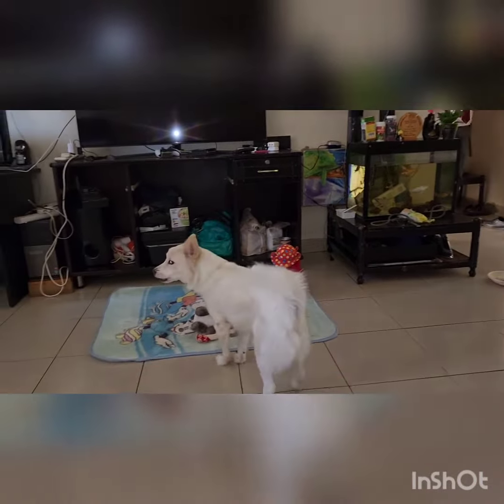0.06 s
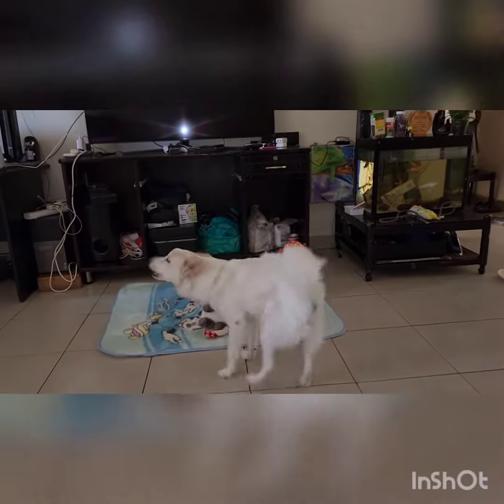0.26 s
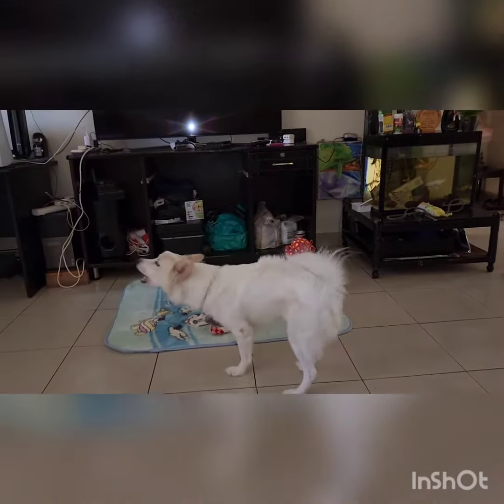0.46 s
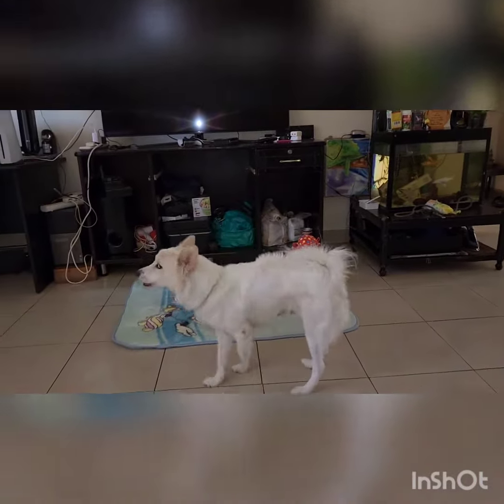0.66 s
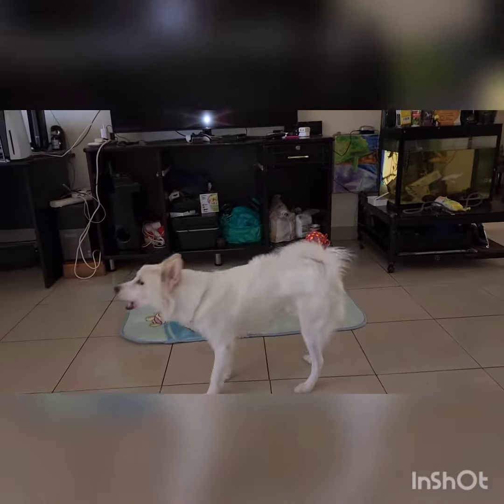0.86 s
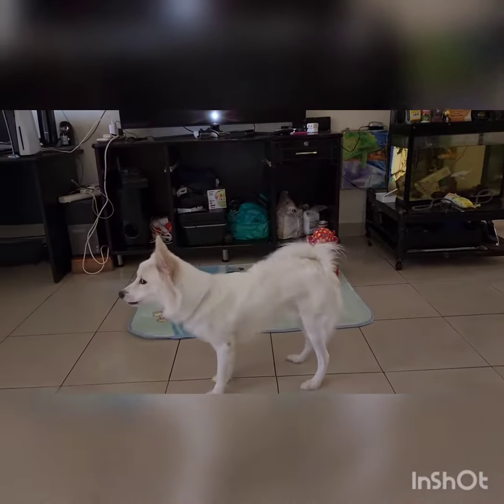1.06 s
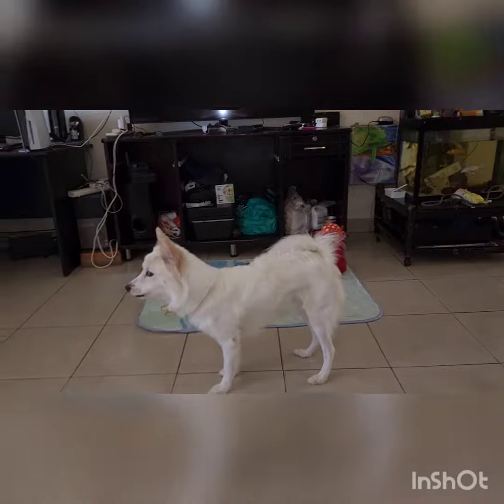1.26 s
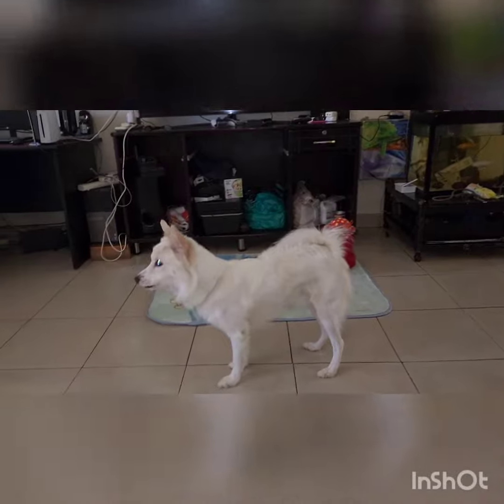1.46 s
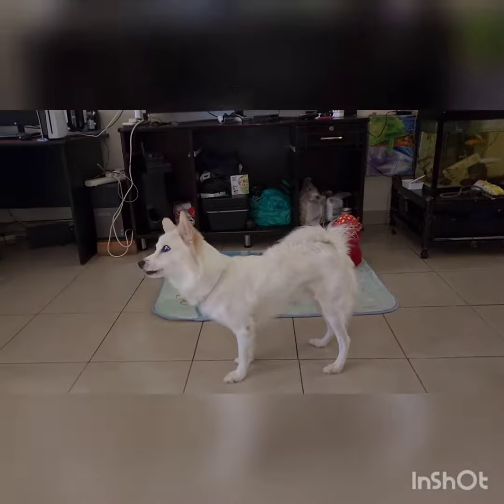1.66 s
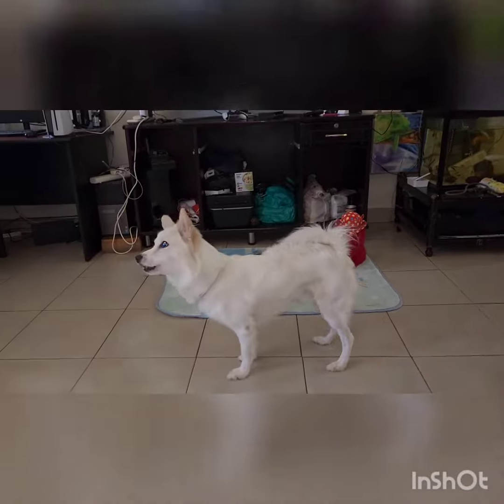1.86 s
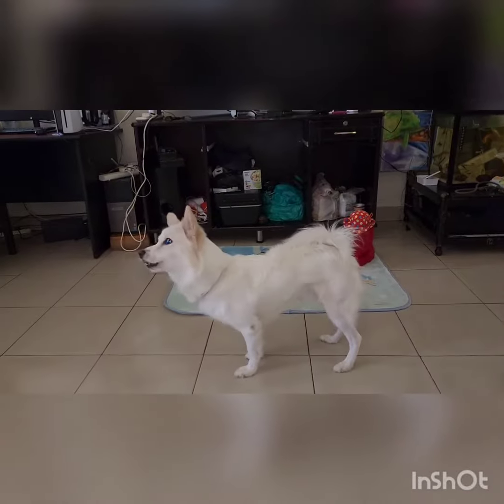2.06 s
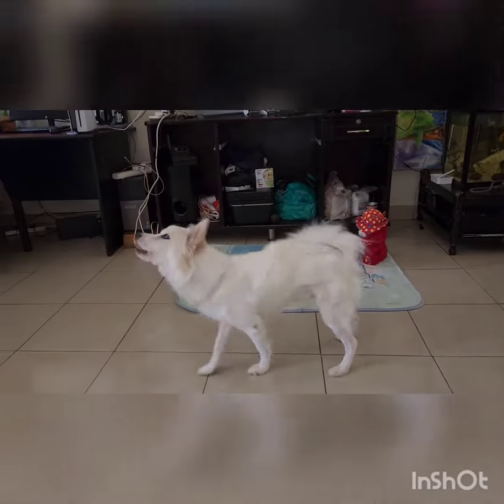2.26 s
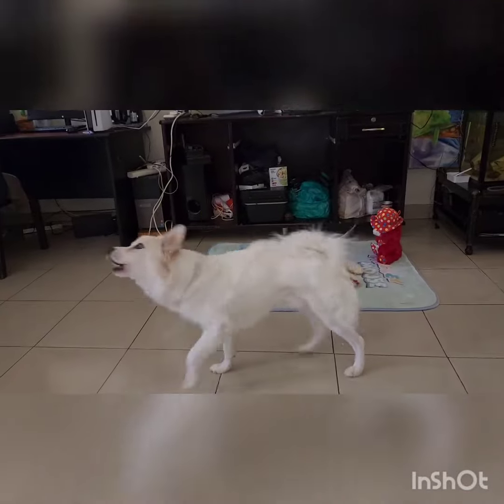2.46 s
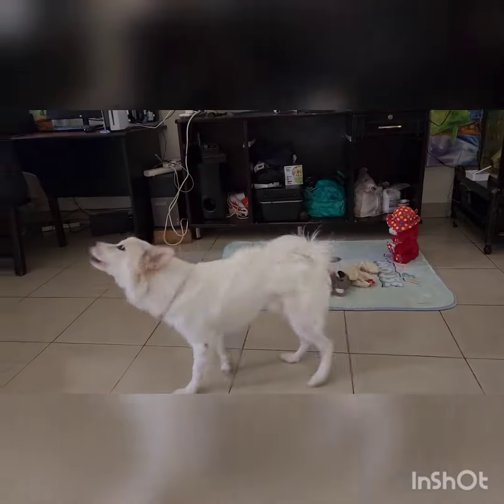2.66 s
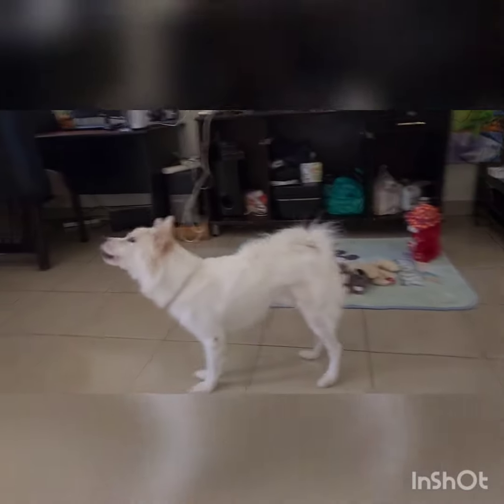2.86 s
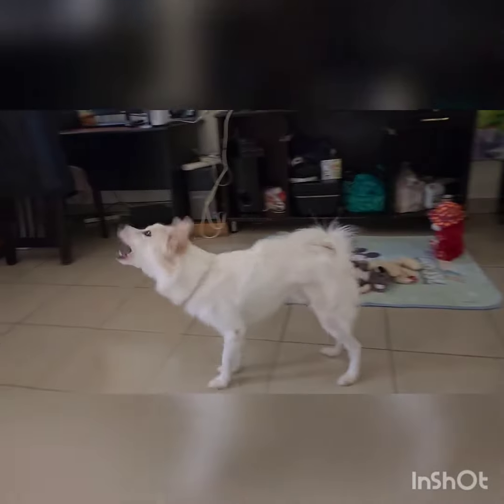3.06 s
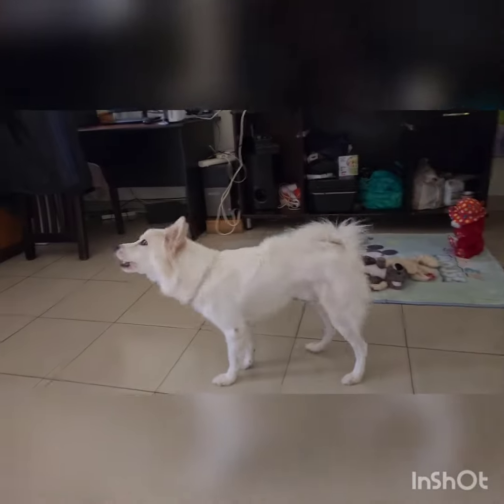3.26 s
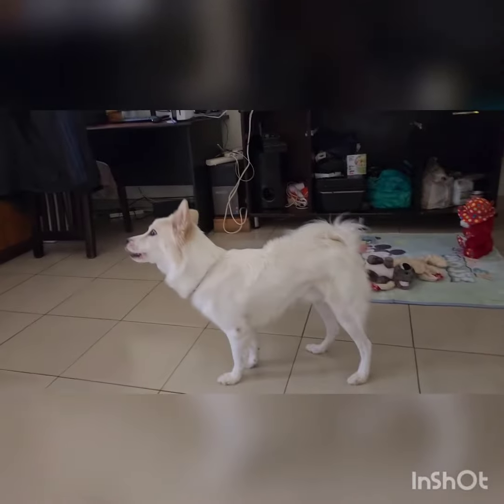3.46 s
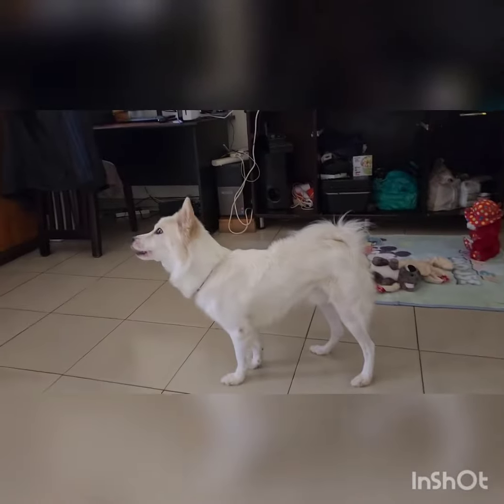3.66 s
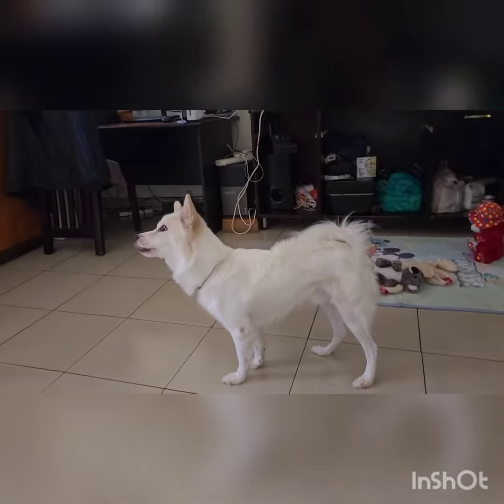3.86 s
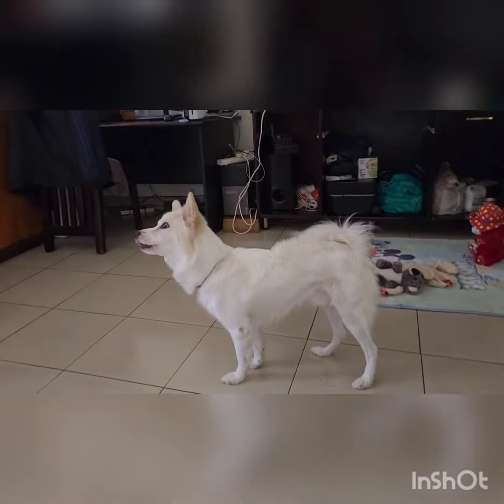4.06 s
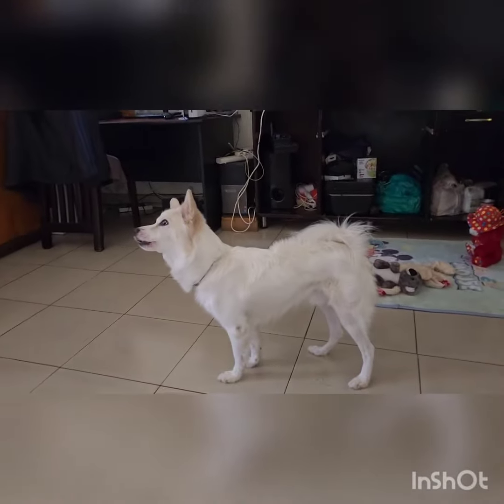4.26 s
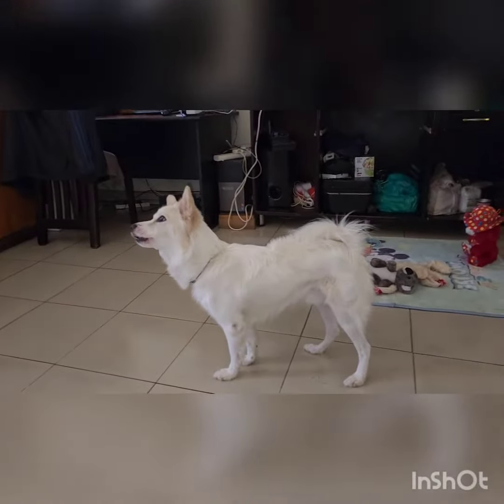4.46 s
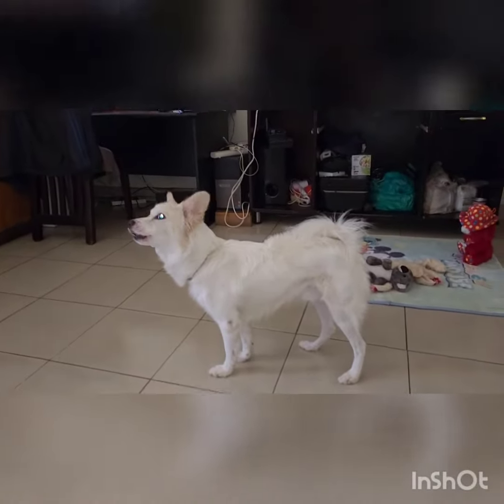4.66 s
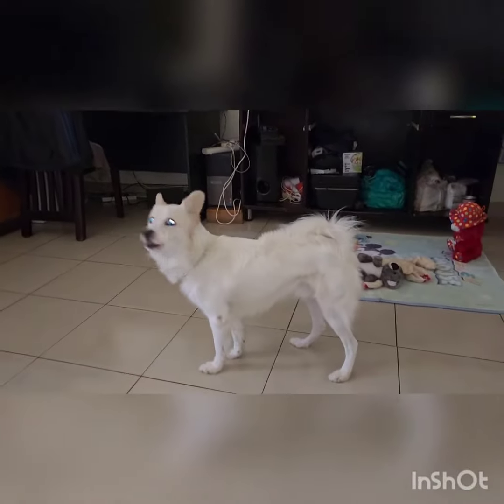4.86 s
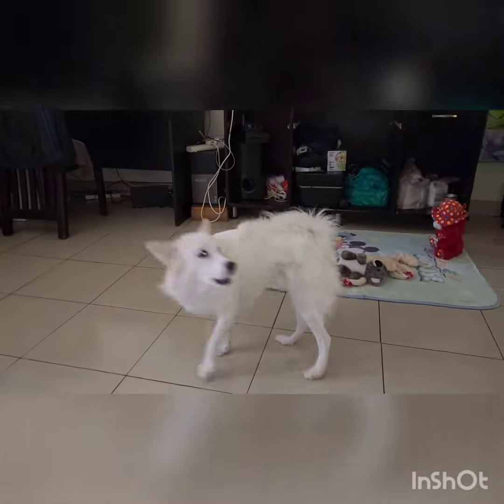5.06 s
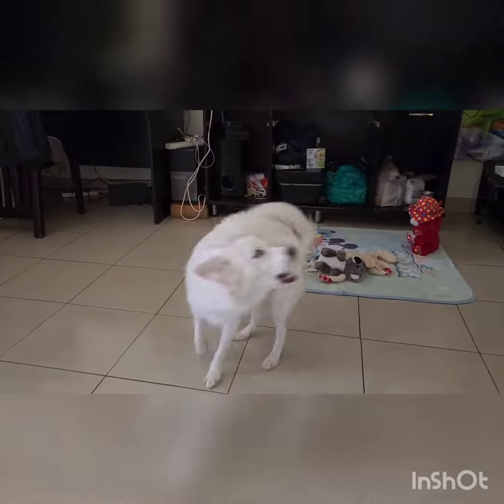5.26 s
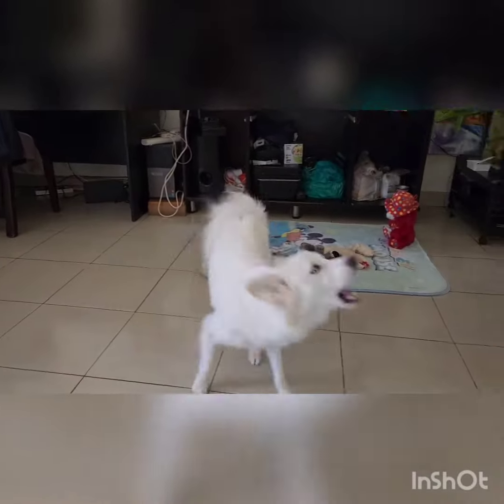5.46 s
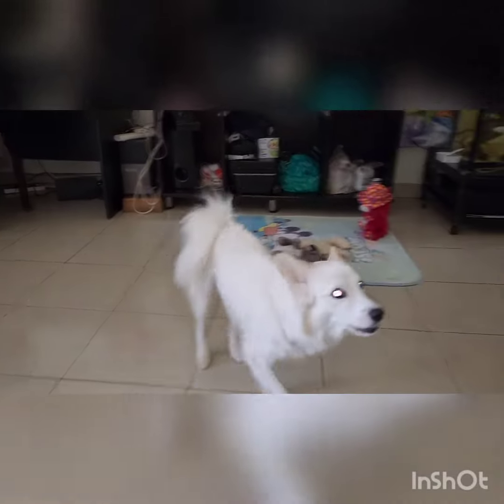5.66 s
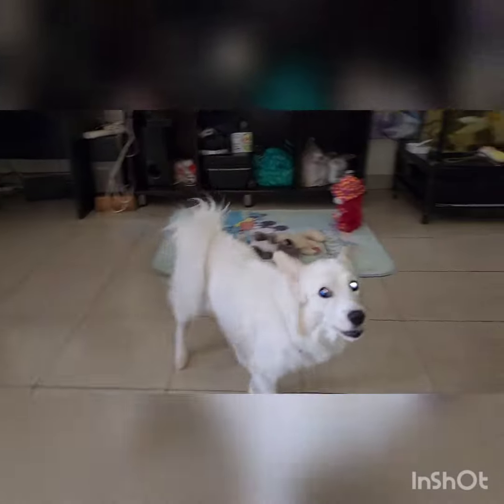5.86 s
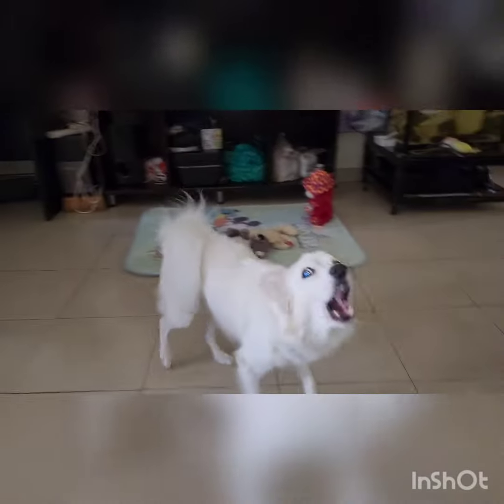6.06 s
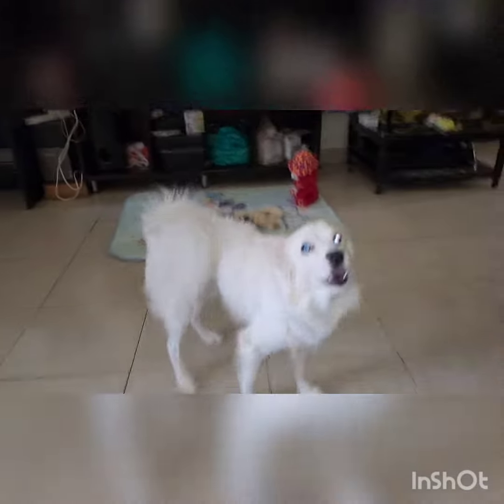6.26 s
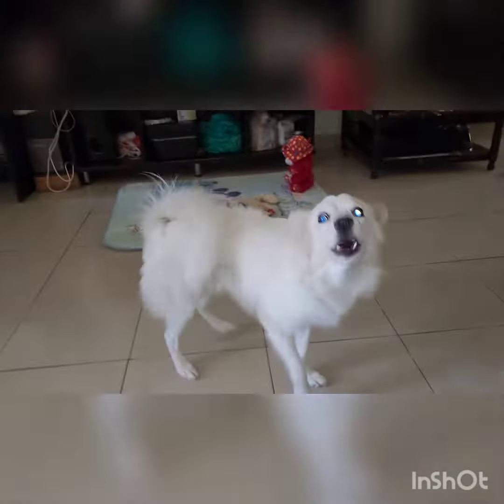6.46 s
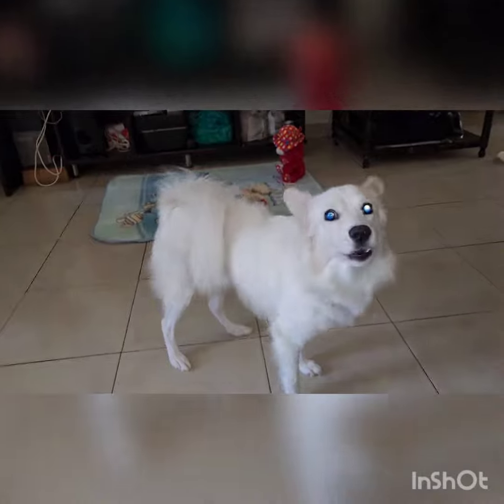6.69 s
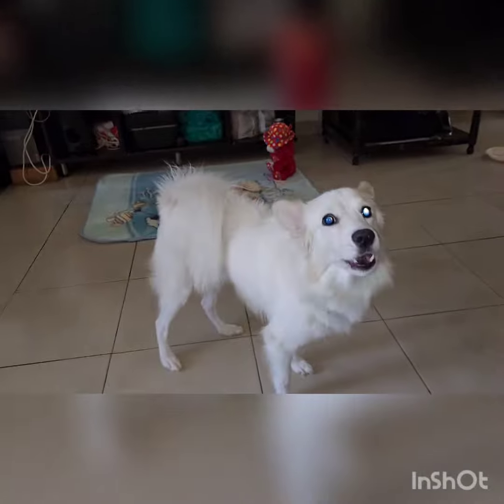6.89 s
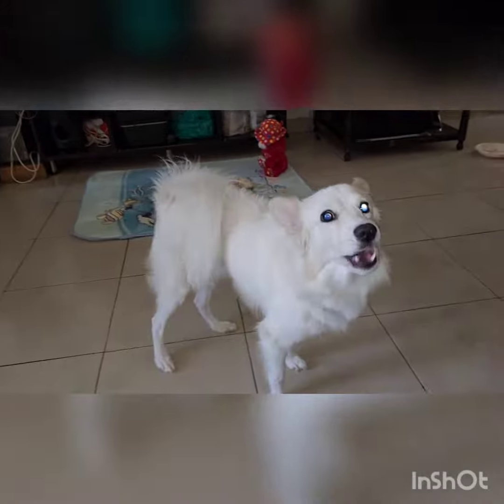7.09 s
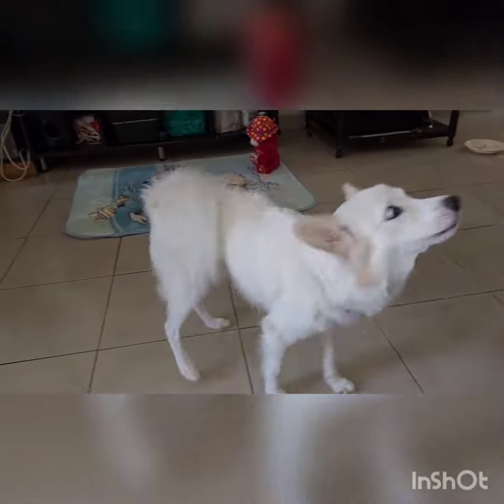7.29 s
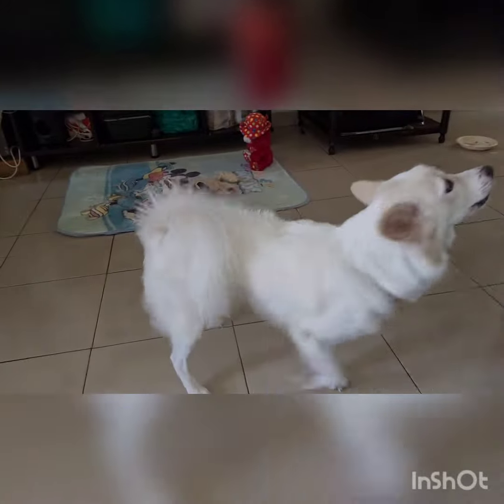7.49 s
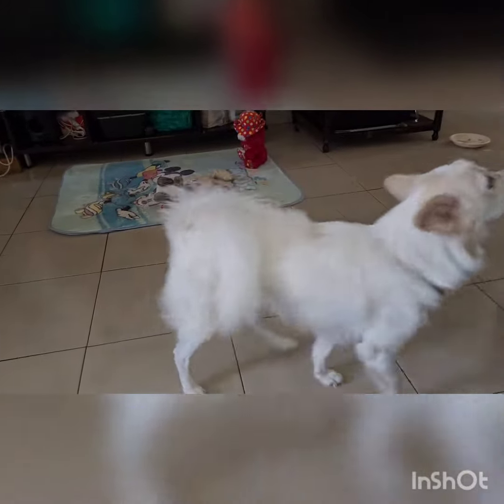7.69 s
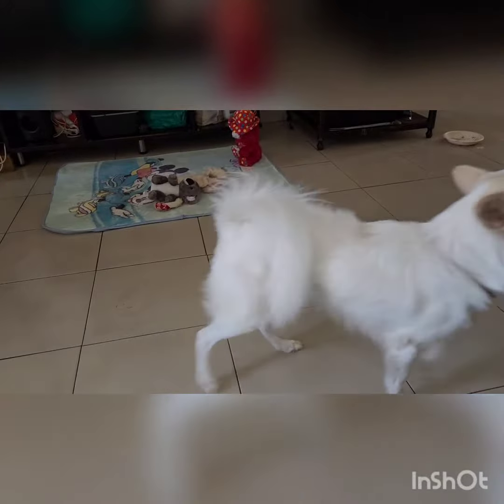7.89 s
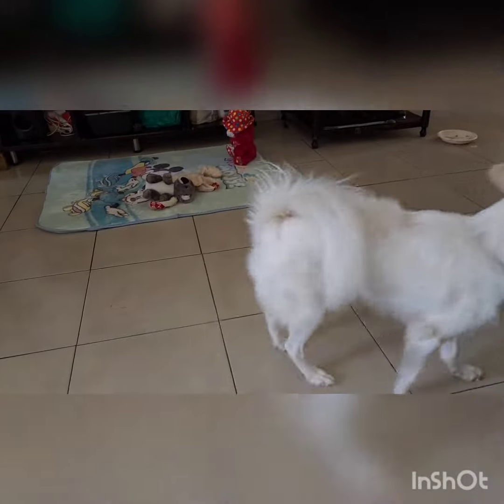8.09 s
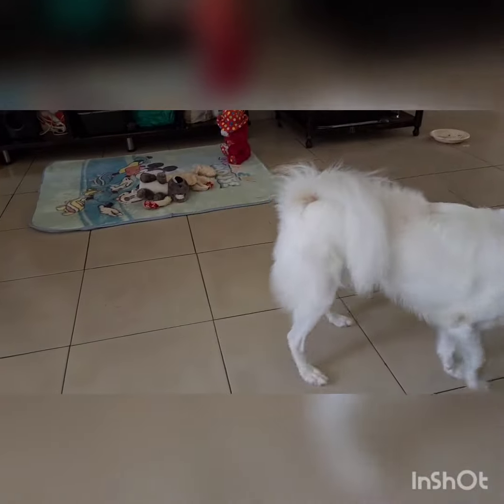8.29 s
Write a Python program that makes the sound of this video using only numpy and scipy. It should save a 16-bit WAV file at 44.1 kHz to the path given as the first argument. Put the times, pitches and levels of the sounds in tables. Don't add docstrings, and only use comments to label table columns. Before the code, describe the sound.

Indoors on hard tile, a phone microphone hears a small dog's high, raspy barks with bright echoes. Grumbling leads into the first bout; a muffled door slam precedes a second. A pause holds only hum, soft breath and faint ticks. A sharp wooden knock bounces, then come nearer, higher barks spaced apart with short growls, drifting right, and finally a soft pant and faint bumps.

```python
import sys
import numpy as np
from scipy import signal
from scipy.fft import rfft, irfft, next_fast_len
from scipy.io import wavfile
from scipy.ndimage import uniform_filter1d, map_coordinates

SR = 44100
rng = np.random.default_rng(int(sys.argv[2]) if len(sys.argv) > 2 else 0)


def boost_factor(decibels):
    exponent = np.asarray(decibels, float) / 20
    return 10 ** exponent


def unload_audio(sound):
    columns = np.transpose(np.atleast_2d(sound))
    steps = np.round(np.clip(columns, -1, 1) * 32767)
    wavfile.write(sys.argv[1], SR, steps.astype(np.int16))


N = 367353

TURN_S = 5.9

# f/Hz, t60/s
ROOM_T60 = [(150, 0.81), (600, 0.76), (1200, 0.79), (2500, 0.58), (6000, 0.49), (9000, 0.4), (14000, 0.57)]
# f/Hz, likeness/1
COHERENCE = [(60, 0.95), (200, 1), (500, 0.2), (1000, 0.045), (2000, 0.088), (5000, 0.057)]
# f/Hz, level/dB
ECHO_AWAY = [(120, 6), (250, -3), (700, 3.5), (2000, 4.5), (5000, 12), (14000, 14)]
# f/Hz, level/dB
ECHO_FACING = [(150, 6.5), (700, 6.5), (2000, 2), (5000, 4.5), (14000, 7)]
# f/Hz, level/dB
ECHO_FLOOR = [(120, -4), (300, 9.5), (1000, 2.5), (3000, 1.5), (8000, 10)]
# t/s, left lag/samples, left minus right treble/dB
PLACE = [(0, -3.5, 2), (3.3, -7.5, 4.5), (5.103, -3.5, -4.5), (5.552, 6, -10), (8.33, 9, -11.5)]
# f/Hz, left minus right level/dB
PORTS = [(60, 1.3), (110, -2.5), (200, 0.5), (380, -2.5), (700, 0.5), (1290, -3.5), (2380, -3.5),
         (4400, -0.5), (8120, -4.5), (15000, 1)]

# t/s, level/dB
HUM_LEVEL = [(0.0, -43), (0.44, -54.5), (1.79, -60), (1.88, -36.5), (2.04, -36.5), (2.2, -45.5),
             (2.71, -55.5), (2.95, -50), (3.29, -57.5), (4.781, -52), (5.08, -39.5), (5.29, -62),
             (6.4, -58.5), (7.05, -58), (7.26, -62), (8.19, -62), (8.33, -58)]
# f/Hz, level/(dB per Hz)
HUM_SPECTRUM = [(12, -51), (20, -19.5), (65, -10), (182, -12), (270, -17.5), (293, -18.5), (499, -31.5),
                (542, -29.5), (759, -29.5), (825, -34), (1060, -36), (1290, -33), (4000, -46.5),
                (8500, -49), (9500, -68), (16000, -87)]
# t/s, level/dB
HISS_LEVEL = [(0, -74), (3.8, -75.5), (5.2, -73), (8.33, -79)]
# f/Hz, level/(dB per Hz)
HISS_SPECTRUM = [(200, -32.5), (400, 7.5), (1000, -7), (3000, -18), (8000, -15.5), (9000, -22),
                 (10000, -42), (15500, -55.5), (16500, -66)]
# t/s, level/dB
DRONE_LEVEL = [(0, -68), (.9, -54), (1.1, -51), (1.8, -56.5), (2.25, -41), (2.6, -43), (2.898, -57),
               (4.3, -51.5), (4.5, -54.5), (4.701, -51), (5.2, -67), (8.33, -70)]
# f/Hz, level/(dB per Hz)
DRONE_SPECTRUM = [(30, -37.5), (42, -11.5), (57, 13.5), (72, -5.5), (95, -48.5)]

# t/s, length/s, throat level/dB, first f/Hz, last f/Hz
GRUMBLES = [(0.023, 0.1, -23.5, 218.5, 244), (0.081, 0.17, -11.5, 228.7, 230.3),
            (0.447, 0.13, -28.5, 222.3, 232.3), (0.665, 0.12, -30, 245.3, 239),
            (0.975, 0.099, -37, 255, 224), (4.302, 0.11, -63.5, 181, 248), (5.061, 0.21, -18.5, 214, 263.1),
            (5.992, 0.1, -39, 198.4, 212.7), (6.917, .19, -21, 260, 256.5), (6.986, 0.17, -25, 294.6, 303),
            (7.1, 0.125, -25.5, 264.5, 197.6), (7.686, 0.098, -35, 246, 322.7),
            (7.755, 0.14, -34, 297.7, 324)]
GRUMBLE_GRIT = [(.4, .2, .2, .4), (.28, 0, .05, .4), (.5, 0, .2, .4), (.5, 0, .2, .4), (.35, 0, .2, .4),
                (.25, 0, .2, .4), (.5, .5, .2, 1), (.6, 0, .2, 1.5), (.1, .1, .25, 1.8), (.2, .2, 0, 1.8),
                (.35, .3, 0, 2), (.15, .1, .1, .5), (.2, .9, 0, .3)]
# throat f/Hz, swell/dB, relative fundamental/dB, relative rasp/dB, rasp band scale/1
GRUMBLE_THROAT = [(600, 10.5, -12.5, -26, 0.87), (590, 2, -13, -34.5, .97), (620, 3.5, -8.5, -20.5, 0.93),
                  (610, 6.5, -10.5, -31, 1.9), (590, 8.5, 2.5, -45, 0.83), (600, 5, 25.5, -14.5, .5),
                  (620, -2.5, -13.5, -27.5, 0.82), (551, 2, -5.5, -22, 2), (758, -4, -16.5, -27, 1.01),
                  (590, 4.5, -22, -29.5, 1.2), (560, 1.5, -12, -22.5, 1.01), (600, 0, -10, -33, 0.71),
                  (457, -10, -24, -38, .75)]
# f/Hz, width/Hz, level/dB
SHUT_FAR = [(316, 110, -9.5), (770, 440, -7.5), (1360, 860, -12.5), (2000, 160, -13.5)]
# f/Hz, width/Hz, level/dB
SHUT_NEAR = [(338, 156, -6), (770, 466, -7), (1600, 380, -9.5), (2223, 290, -9.5)]
# f/Hz, level/(dB per Hz)
SHUT_RASP_FAR = [(1590, -53), (2700, -16.5), (3480, -16), (3770, -5), (4220, -4.5), (5360, -10.5),
                 (6120, -19), (6650, -14.5), (8620, -21), (16000, -29.5)]
# f/Hz, level/(dB per Hz)
SHUT_RASP_NEAR = [(3230, -17), (3800, -5), (4130, -2.5), (4700, -15), (5460, -34.5), (6090, -12),
                  (6700, -33), (7310, -15.5), (8410, -20), (9400, -27.5), (16000, -49)]

# t/s, pitch f/Hz, first partial level/dB
EFFORT_FAR = [
    [(.216, 560, -25), (.232, 571.4, -14.5), (.256, 572.5, -6), (.272, 638.5, -8.5), (.29, 725.5, -9.5),
     (.312, 700, -17.5), (.33, 672, -12.5), (.356, 630, -19.5)],
    [(.503, 656.6, -25), (.525, 694.6, -18.5), (.543, 731, -19), (.556, 649.7, -15), (.57, 613, -18.5),
     (.6, 626, -18), (.623, 620, -18.5)],
    [(.842, 643.4, -28.5), (.862, 674, -24), (.874, 703.2, -22.5), (.889, 656.3, -19), (.92, 648, -18.5),
     (.942, 626.3, -20.5)],
    [(2.16, 590, -23.5), (2.178, 636, -11.5), (2.202, 689.5, -7.5), (2.222, 720.7, -13),
     (2.243, 675.6, -10), (2.262, 634, -13), (2.28, 590, -20.5)],
    [(2.374, 560, -35), (2.396, 663.5, -24), (2.428, 713, -15), (2.46, 740.3, -22.5), (2.485, 637.5, -24),
     (2.524, 549, -26)],
    [(2.637, 590, -16), (2.654, 667, -13), (2.675, 686, -15), (2.693, 673, -19.5), (2.725, 686, -18.5),
     (2.747, 549, -23)],
    [(3.12, 560, -18), (3.138, 668.5, -21), (3.153, 695.5, -14.5), (3.172, 708.4, -14.5), (3.186, 625, -24),
     (3.2, 600, -19), (3.23, 544.6, -22.5)],
]
# t/s, pitch f/Hz, first partial level/dB
EFFORT_LATE = [
    [(5.218, 610, -20.5), (5.235, 633.7, -14.5), (5.255, 670, -8), (5.272, 705.3, -9.5), (5.29, 761, -14.5),
     (5.306, 718, -8), (5.328, 717.5, -15)],
    [(5.512, 642.4, -32.5), (5.538, 721, -15.5), (5.554, 711.4, -15.5), (5.575, 713.3, -14),
     (5.6, 677.6, -15), (5.622, 695, -13.5)],
    [(6.038, 600, -20.5), (6.059, 647, -27.5), (6.077, 784, -15), (6.1, 737, -16.5), (6.125, 714.8, -8.5),
     (6.168, 709.3, -13), (6.18, 674, -21.5), (6.2, 540, -32.5)],
    [(6.422, 560, -24), (6.436, 704, -23.5), (6.442, 800, -17.5), (6.457, 817.7, -11.5), (6.484, 770, -18),
     (6.51, 725, -18.5), (6.528, 740.4, -16), (6.552, 678.4, -26)],
    [(7.202, 620, -25), (7.219, 749.4, -11), (7.238, 778.6, -12), (7.255, 797.8, -11), (7.272, 719.5, -14),
     (7.288, 665, -19.5), (7.31, 643.7, -17.5), (7.345, 590, -29.5)],
]
BARK_MANNER = [(.3, .45, .15), (.45, .2, .1), (.45, .35, .15), (.3, .45, .3), (.55, .55, .3),
               (.32, .55, .3), (.2, .55, .3), (.3, .3, .2), (.55, .04, .05), (.6, .04, .25), (.25, .5, .4),
               (.5, .22, .25)]
# relative overtones/dB, relative rasp/dB, second resonance f/Hz, third resonance f/Hz
BARK_MOUTHS = [(3.5, -19, 1160, 1900), (3.3, -22.5, 1142, 1670), (3.7, -19, 1225, 1754),
               (0.48, -24, 1258, 1733), (3.1, -21, 1110, 1680), (2.15, -21.5, 1130, 1660),
               (3.8, -22.5, 1152, 1670), (3.4, -22.5, 1342, 1950), (0.5, -23, 1200, 1706),
               (1.7, -16.5, 1320, 2050), (4.9, -12, 1292, 1944), (1.5, -17, 1270, 1920)]
# resonance sink/1, rasp twang/dB, twang f/Hz, twang width/Hz, clear upper partials/dB
BARK_JAWS = [(0.0734, 2, 4150, 800, -1), (0, -2, 2000, 800, 0.5), (.1, -5.5, 4150, 380, 1),
             (0.2, 1.5, 1800, 800, 4.5), (.1, -4, 3400, 660, 0), (0.066, -2.5, 3700, 530, 1.5),
             (.2, -4.5, 4200, 380, 5), (.12, 8, 4700, 1200, -6), (0.17, 3.5, 5400, 1000, -4),
             (0.02, 4, 4150, 520, 5.5), (0.015, 10, 4140, 700, 1.5), (0.21, 5, 4150, 950, 9)]
# widest jaw at share/1, hardest air rush at share/1, relative third resonance/dB
BARK_TIMING = [(0.89, 1, 0.5), (0.48, 0.347, 0.7), (0.64, 0.19, 2.15), (0.13, 0.51, 0.7), (0.99, .45, -1.1),
               (0.8, 0.39, -0.8), (0.57, 0.64, 0), (0.71, 0.73, 0), (.4, 0.75, 1.5), (0.34, 0.37, 0.1),
               (0.56, 0.95, 1.6), (0.34, 0.51, 1.5)]
# f/Hz, level/(dB per Hz)
RASP_AWAY = [(1530, -29.5), (2300, -24.5), (2700, -13.5), (3080, -6), (3480, -19.5), (3900, -10),
             (4430, -12.5), (4960, -17.5), (6520, -10), (8070, -12.5), (9400, -22), (12000, -23.5),
             (14600, -27), (16000, -32)]
# f/Hz, level/(dB per Hz)
RASP_FACING = [(1530, -30), (2500, -16.5), (3000, -6), (4200, -18), (4920, -17), (6430, -9), (7200, -10.5),
               (8070, -7.5), (9820, -21.5), (11500, -21), (13500, -27.5), (16000, -30)]

# t/s, peak level/dB
CLAWS = [(1.299, -54.5), (1.3729, -43.5), (1.381, -45), (1.39, -49), (1.4712, -61), (1.7899, -53),
         (3.8849, -54), (4.4494, -58), (8.0371, -63), (8.073, -46)]

# latch level/dB, slam level/dB, fall/(dB per s)
DOOR_PARTS = [(-30.5, -15, 21), (-62, -26.5, 18), (-45, -21, 67), (-34.5, -32, 58.5)]
# f/Hz, level/dB
BOOM = [(36, -7), (59, -2.5)]
# f/Hz, level/dB
PANEL = [(121, 8), (168, -29), (284, 5)]
# f/Hz, level/(dB per Hz)
RATTLE = [(190, -29.5), (330, -7), (731, -11.5), (833, -4), (1310, -11.5), (2100, -12), (2510, -20.5),
          (3600, -23.5), (6000, -28.5), (7460, -23.5), (9000, -31.5), (10600, -31), (14500, -38.5),
          (16000, -51)]

# t/s, length/s, level/dB
CHEST = [
    (2.516, 0.2, -43),
    (3.121, 0.086, -40.5),
    (5.668, 0.1, -47.5),
    (6.272, 0.25, -41.5),
]
# f/Hz, level/(dB per Hz)
CHEST_SPECTRUM = [(70, -42.5), (130, -9.5), (250, 0.5), (400, -5.5), (600, -6.5), (1000, -68.5)]

# t/s, length/s, level/dB
PANTS = [
    (3.858, 0.32, -68),
    (4.288, .3, -64),
    (7.694, .18, -67),
    (8.148, 0.16, -56.5),
]
# f/Hz, level/(dB per Hz)
PANT_SPECTRUM = [(350, -38.5), (600, -22), (1100, -4.5), (1160, -11), (1330, -6.5), (2040, -0.5),
                 (3040, -9), (13400, -23), (16000, -20.5)]

# t/s, peak level/dB, relative thud/dB, relative crack/dB, room level/dB
KNOCKS = [
    (4.765, -12, -13, -34.5, 4.5),
    (4.939, -18, -2.5, -47, 10),
    (4.965, -20.5, 6, -35.5, -0.5),
    (8.149, -59.5, 24, -13, 7),
    (8.168, -60, 30.5, -16, 1.5),
    (8.202, -54, 26.5, -23, -0.5),
]
# f/Hz, width/Hz, level/dB
WOOD = [(446, 404, 9), (800, 130, 18.5), (1224, 250, 9), (2000, 1500, 1.5), (3100, 1400, -4.5)]
# f/Hz, width/Hz, level/dB
FLOOR_MODES = [(67.7, 14, -30), (120, 16, 6.5), (201.6, 70, 3.5)]
# f/Hz, width/Hz, level/dB
TILE_MODES = [(70, 73, 1), (118, 60, 3.5), (290, 200, -14.5)]
# t/s, peak level/dB
SPIN_TICKS = [(4.7661, -59.5), (4.7708, -50), (4.9053, -38), (4.9236, -40), (4.9714, -37.5), (5.03, -48),
              (5.225, -41.5), (5.4593, -34), (5.5201, -42.5), (5.8139, -55)]
# f/Hz, width/Hz, level/dB
SPIN_TICK_MODES = [(10500, 5000, 8.5)]


def along(points, hz):
    f, v = np.transpose(points)
    return np.interp(np.log(hz + 1), np.log(f + 1), v)


def over_time(points):
    return np.interp(np.arange(N) / SR, *np.transpose(points))


def unit(x):
    return x / np.sqrt(np.mean(x ** 2) + 1e-20)


def wobble(n, rate):
    knots = rng.standard_normal(int(n * 1000 / SR) + 4)
    return map_coordinates(knots, [np.arange(n) * min(rate, 1000) / SR])


def filtered(x, response):
    m = next_fast_len(x.shape[-1] + 8192)
    return irfft(rfft(x, m) * response(np.fft.rfftfreq(m, 1 / SR)), m)[..., :x.shape[-1]]


def modes(table):
    def response(f):
        return sum((-1) ** k * boost_factor(db) * 1j * f * w / (c * c - f * f + 1j * f * w)
                   for k, (c, w, db) in enumerate(table))
    return response


def noise(n, spectrum):
    return unit(filtered(rng.standard_normal(n), lambda hz: boost_factor(along(spectrum, hz))))


def pair(ab):
    def mid_side(hz):
        turn = np.arccos(np.clip(along(COHERENCE, hz), 0, 1)) / 2
        return np.array([np.cos(turn), np.sin(turn)])
    mid, side = filtered(ab, mid_side)
    return np.array([mid + side, mid - side])


def noise_pair(n, spectrum):
    return pair(np.array([noise(n, spectrum), noise(n, spectrum)]))


def unroll(s, length, hold=0.0):
    t = np.arange(-length, hold, 1 / SR)
    return round(s * SR), t, np.clip(1 + t / length, 0, 1)


def add(out, at, x, room_db, pane_db=-40, colour=None):
    t = np.arange(SR) / SR
    hz, frames, z = signal.stft(rng.standard_normal((2, SR)), SR, nperseg=256)
    colour = colour or (ECHO_AWAY if at < TURN_S * SR else ECHO_FACING)
    fall_db = along(colour, hz)[:, None] - 60 * frames / along(ROOM_T60, hz)[:, None]
    tail = signal.istft(z * boost_factor(fall_db), SR, nperseg=256)[1][:, :SR] / 50
    pane_hz, pane_t60_s = 547, 1.9
    tail[0] += boost_factor(pane_db - 45 - 60 * t / pane_t60_s) * np.sin(2 * np.pi * pane_hz * t)
    tail = pair(tail * np.clip(t / .005, 0, 1))
    wet = boost_factor(room_db) * signal.fftconvolve(x[None], tail, axes=1)

    s, lags, pans = np.transpose(PLACE)
    lag = np.interp(at / SR, s, lags)
    pan_db = np.interp(at / SR, s, pans)
    half = np.array([[.5], [-.5]])

    def bearing(f):
        shadow = boost_factor(half * pan_db * f ** 2 / (f ** 2 + 1500 ** 2))
        return shadow * np.exp(-2j * np.pi * f * half * lag / SR)
    wet[:, :len(x)] += filtered(x, bearing)
    out[:, at:at + wet.shape[1]] += wet[:, :N - at]


def voice(pitch, rough, alternate, mouth, top_hz, first_db, high_db, rasp_db, rasp,
          jaw=1, sag=1, slap=0, clear_db=0):
    n = len(pitch)

    def colour(hz):
        return np.abs(modes(mouth)(hz)) ** 2.19 * (hz < top_hz)

    pitch = pitch * (1 + .1 * rough * wobble(n, 330) + .004 * wobble(n, 60))
    phase = 2 * np.pi * np.cumsum(pitch) / SR
    k = np.arange(1, 24)[:, None]
    gain = colour(k * pitch / (jaw * sag)) * boost_factor(high_db - 11.0 * rough)
    gain += (k * pitch > top_hz) * boost_factor(rasp_db + along(rasp, k * pitch) - 20 * rough + clear_db)
    gain[0] = boost_factor(first_db + 1.0)
    shimmer = np.array([wobble(n, 260) for _ in k]) + wobble(n, 110)
    partials = np.cos(k * phase + .6 * np.exp(-slap) * k * k)
    tone = (gain * boost_factor(4.5 * rough * shimmer) * partials).sum(0)
    tone *= 1 + alternate * np.cos(phase / 2)

    air = unit(filtered(rng.standard_normal(2 * n), colour))
    breath = rough * boost_factor(high_db) * map_coordinates(air, [np.cumsum(jaw * np.ones(n))])

    beat = alternate * np.cos(phase / 2 + 2 * wobble(n, 25)) + np.cos(phase)
    scatter_db = 3 * min(slap, 1) * np.clip(wobble(n, 90), -2, 1.3)
    gate = np.exp(slap * beat) * boost_factor(scatter_db)
    ripple = 3 * rng.standard_normal(80)

    def airway(hz):
        return boost_factor(along(rasp, hz) + np.interp(hz, np.arange(80) * 220, ripple))
    hiss = unit(filtered(gate * rng.standard_normal(n), airway))
    hiss = boost_factor(rasp_db - 2 + 2 * wobble(n, 70)) * hiss

    i = np.arange(n)
    fade = np.clip(np.minimum(i / .02, (n - i) / .03) / SR, 0, 1)
    stutter = boost_factor(3 * rough * np.clip(wobble(n, 75), -2, 1.3))
    lowest_hz = .4 * pitch.max()
    return filtered((tone + breath + hiss) * fade * stutter,
                    lambda hz: 1 / (1 + (lowest_hz / (hz + 1)) ** 5))


def hum():
    house = boost_factor(3 + over_time(HUM_LEVEL) + 2 * wobble(N, 6.9)) * noise_pair(N, HUM_SPECTRUM)
    hiss = boost_factor(over_time(HISS_LEVEL)) * np.array([noise(N, HISS_SPECTRUM), noise(N, HISS_SPECTRUM)])
    drone = boost_factor(over_time(DRONE_LEVEL)) * noise(N, DRONE_SPECTRUM)
    return house + hiss + drone


def grumbles(out):
    dog = np.zeros_like(out)
    for grumble, grit, throat in zip(GRUMBLES, GRUMBLE_GRIT, GRUMBLE_THROAT):
        s, length, db, first_hz, last_hz = grumble
        rough, alternate, scoop, slap = grit
        throat_hz, swell_db, chest_db, rasp_db, scale = throat
        at, t, share = unroll(s, length)
        since = t + length
        rising = np.clip(1 - since / 0.043, 0, 1)
        db = db - 2.5 * rising + swell_db * (share - .5) + 2.3 * wobble(len(t), 21)
        slide = scoop * np.clip(1 - since / 0.041, 0, 1)
        pitch = (first_hz + (last_hz - first_hz) * share) * (1 - slide + .015 * wobble(len(t), 14))
        far = s < TURN_S
        mouth = sorted((SHUT_FAR if far else SHUT_NEAR) + [(throat_hz, 110, 0)])
        rasp = (SHUT_RASP_FAR if far else SHUT_RASP_NEAR) * np.array([scale, 1])
        sound = voice(pitch, rough, alternate, mouth, 2200, db + chest_db - 3.5, db + 0.5, db + rasp_db,
                      rasp, slap=slap, clear_db=-7)
        add(dog, at, sound, -9)
    return dog


def barks(out):
    dog = np.zeros_like(out)
    for effort, manner, mouth_shape, jaw_shape, timing in zip(
            EFFORT_FAR + EFFORT_LATE, BARK_MANNER, BARK_MOUTHS, BARK_JAWS, BARK_TIMING):
        rough0, rough1, drop = manner
        open_db, rasp_db, second_hz, third_hz = mouth_shape
        sink, twang_db, twang_hz, width_hz, clear_db = jaw_shape
        widest, raspiest, tilt_db = timing
        s, hz, level = np.transpose(effort)
        far = s[0] < TURN_S
        at, t, share = unroll(s[0], s[-1] - s[0], hold=.1)
        room_db, third_db, shut_db = (-4.5, -6, -21.5) if far else (-11.5, -3.5, -22)
        shut = np.clip(t / 0.058, 0, 1)
        db = np.interp(t + s[-1], s, level) + shut_db * shut ** 1.3
        pitch = uniform_filter1d(np.interp(t + s[-1], s, hz), size=300)
        narrow = np.interp(share, [0, widest, 1], [1, 0, np.clip(2 * rough1, .7, 1)]) ** 2
        calm = np.interp(share, [0, raspiest, 1], [1, 0, .4]) ** 0.76
        rough = np.interp(t, [.6 * t[0], .45 * t[0], 0, .04], [rough0, rough1, rough1, rough1 + .25])
        mouth = [(620, 380, -2), (second_hz, 200, 0), (third_hz, 340, third_db + tilt_db)]
        steady_db = .5 * (uniform_filter1d(db, size=1500) + db)
        jaw = 1 + sink * (.5 - share) - .09 * (narrow - .3)
        bark = voice(pitch * (1 - drop * shut), rough, 0, mouth, 2600, db, db + open_db - 11.5 * narrow,
                     steady_db + rasp_db - 11 * calm, RASP_AWAY if far else RASP_FACING,
                     jaw, 1 - .03 * narrow, clear_db=clear_db)
        bark = filtered(bark, lambda f: boost_factor(twang_db * np.exp(-((f - twang_hz) / width_hz) ** 2)))
        add(dog, at, bark, room_db, -15 if s[0] < 1.5 else -40)
    return dog


def tick_sounds(out, events, fall_s, response, gain_db, room_db):
    sound, t = np.zeros_like(out), np.arange(SR // 8) / SR
    for s, db in events:
        tick = filtered(boost_factor(-60 * t / fall_s) * rng.standard_normal(len(t)), response)
        add(sound, round(s * SR), boost_factor(db + gain_db) * tick / np.abs(tick).max(), room_db)
    return sound


def claws(out):
    return tick_sounds(out, CLAWS, 0.0034, lambda hz: modes([(4600, 4500, 0)])(hz) ** 2, 0, -16)


def door(out):
    latch_s, slam_s, end_s, jolt_s = 1.838, 1.903, 2.16, 0.009
    at, t, _ = unroll(latch_s, end_s - latch_s, hold=0.35)
    n, sound = len(t), np.zeros_like(out)
    since_latch, since_slam = t - t[0], t + end_s - slam_s
    jolt = np.clip(since_slam / jolt_s, 0, 1)
    boom_db, panel_db, rattle_db, hiss_db = (
        latch_db + jolt * (slam_db - latch_db - fall_db * since_slam)
        for latch_db, slam_db, fall_db in DOOR_PARTS)

    def ring(table):
        return unit(sum(boost_factor(db + 0.835 * wobble(n, 25)) * np.sin(2 * np.pi * hz * t + .5 * wobble(n, 15))
                        for hz, db in table))
    panel = ring(PANEL) + 0.5 * noise(n, [(60, -29), (100, 3.0), (330, -3.5), (450, -53.5)])
    onset = np.clip(since_latch / jolt_s, 0, 1)
    body = onset * (boost_factor(boom_db) * ring(BOOM) + boost_factor(panel_db) * panel)

    raw = noise_pair(n, RATTLE)
    low = filtered(raw, lambda hz: 1 / (1 + (hz / 2450) ** 8))
    rattle = boost_factor(rattle_db) * unit(low)
    clatter_db = hiss_db - 92 * since_latch * (1 - jolt) + 1.42 * wobble(n, 40)
    hiss = boost_factor(clatter_db) * unit(raw - low)
    ducked = boost_factor(-30 * np.clip((t - .04) / 0.016, 0, 1))
    sound[:, at:at + n] = ducked * (body + rattle + hiss)
    return sound


def chest(out):
    sound = np.zeros_like(out)
    for s, length, db in CHEST:
        at, t, _ = unroll(s, length)
        n = len(t)
        rumble = noise(n, CHEST_SPECTRUM) * np.hanning(n) ** 0.2
        add(sound, at, boost_factor(db + 1.7 * wobble(n, 50)) * rumble, -8)
    return sound


def pants(out):
    sound = np.zeros_like(out)
    for s, length, db in PANTS:
        at, t, _ = unroll(s, length)
        n = len(t)
        breath = noise(n, PANT_SPECTRUM) * np.hanning(n) ** 0.22
        add(sound, at, boost_factor(db + 1.1 * wobble(n, 27)) * breath, -2)
    return sound


def knocks(out):
    sound, t = np.zeros_like(out), np.arange(SR // 8) / SR
    for s, db, thud_db, crack_db, room_db in KNOCKS:
        blow = boost_factor(-60 * t / 0.026) * rng.standard_normal(len(t))
        blow[0] = 9.2
        wood = unit(filtered(blow, modes(WOOD)))
        thud = unit(filtered(blow, modes(FLOOR_MODES if s < TURN_S else TILE_MODES)))
        crack = unit(filtered(blow, lambda hz: (hz / 3000) ** 2 / (1 + (hz / 3000) ** 3)))
        knock = wood + boost_factor(thud_db) * thud + boost_factor(crack_db - 5.5) * crack
        add(sound, round(s * SR), boost_factor(db - 19.5) * knock, room_db, colour=ECHO_FLOOR)
    return sound


def spin_ticks(out):
    return tick_sounds(out, SPIN_TICKS, 0.007, modes(SPIN_TICK_MODES), 2.5, -12)


def scene():
    air = hum()
    dog = grumbles(air) + barks(air) + chest(air) + pants(air)
    contacts = claws(air) + knocks(air) + spin_ticks(air)
    return air + dog + door(air) + contacts


def top_cut(x):
    return signal.sosfilt(signal.butter(12, 16640, fs=SR, output="sos"), x)


def record(dry):
    half = np.array([[.5], [-.5]])
    x = filtered(dry, lambda hz: boost_factor(half * along(PORTS, hz)) * (hz < 15830))
    x = x / (1 + np.abs(x) ** 6) ** (1 / 6)
    return top_cut(x)


dry = scene()
out = record(dry)
unload_audio(out)
```